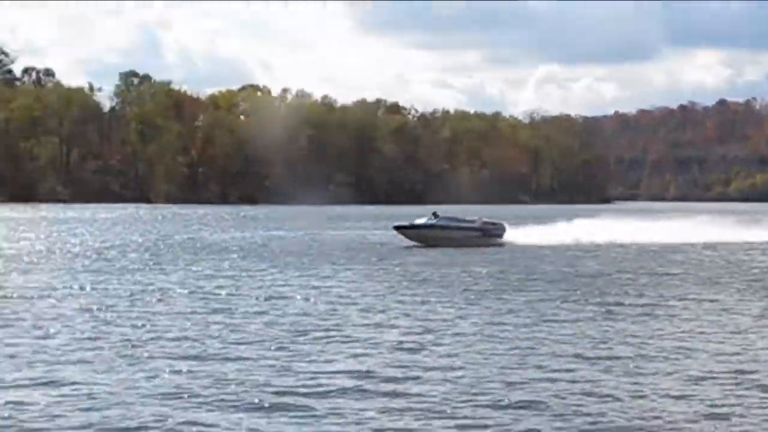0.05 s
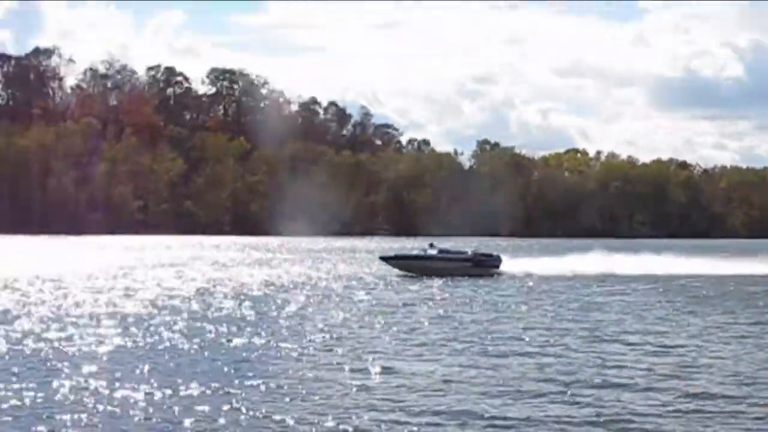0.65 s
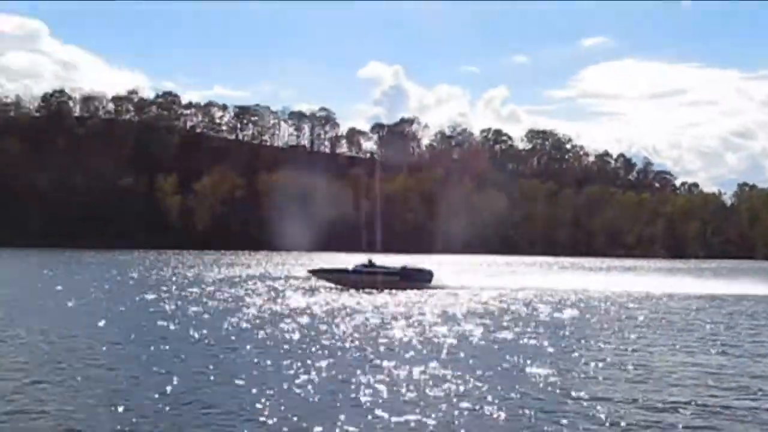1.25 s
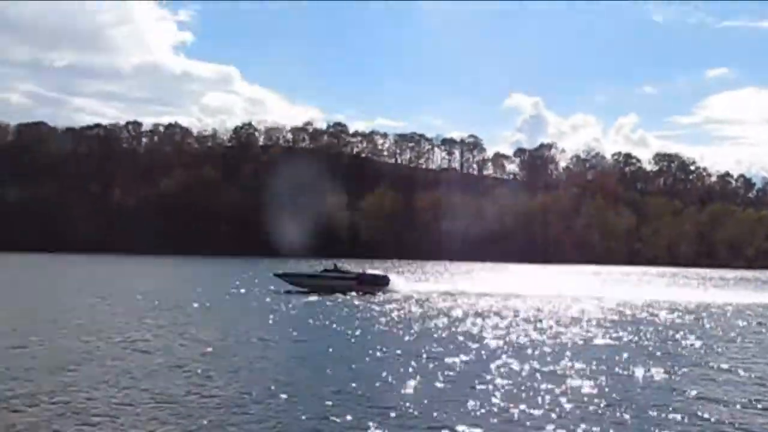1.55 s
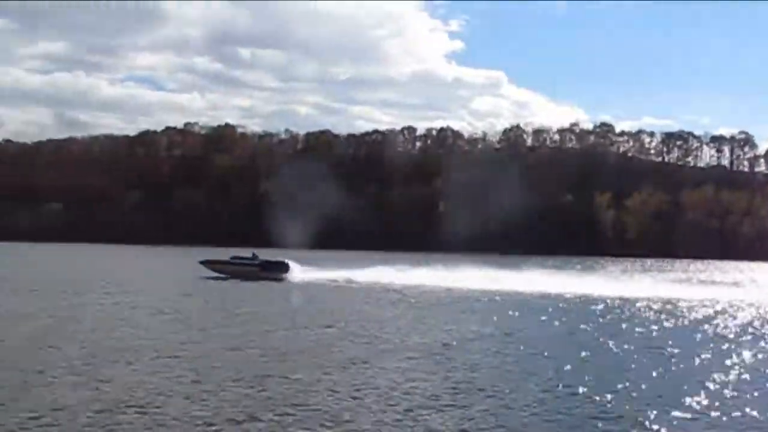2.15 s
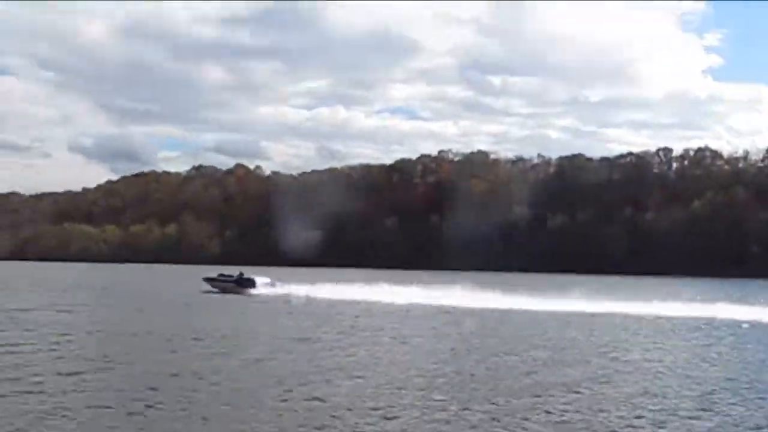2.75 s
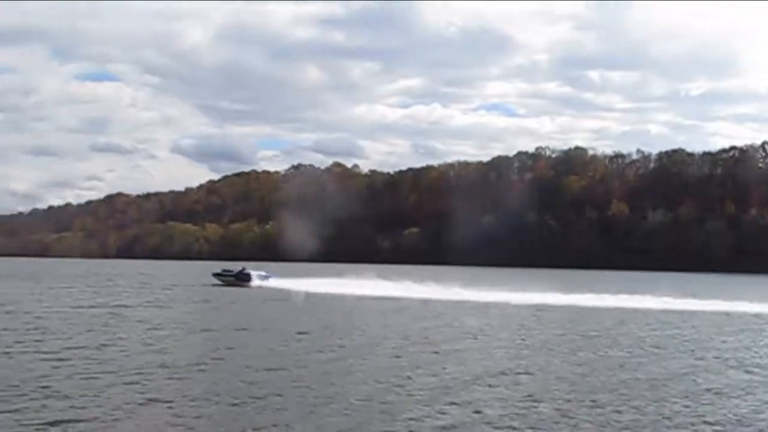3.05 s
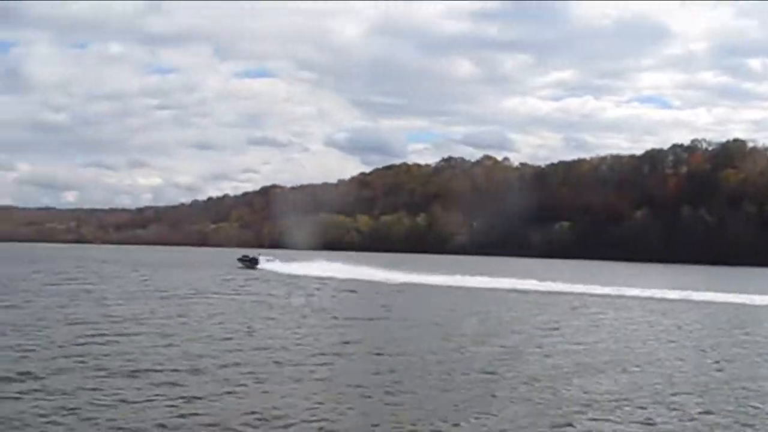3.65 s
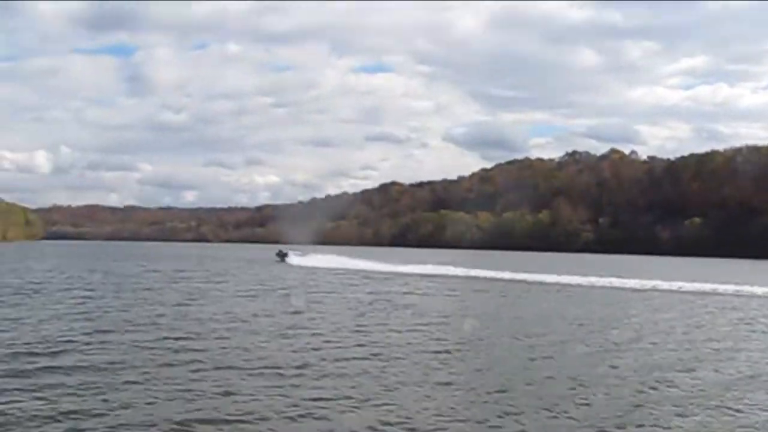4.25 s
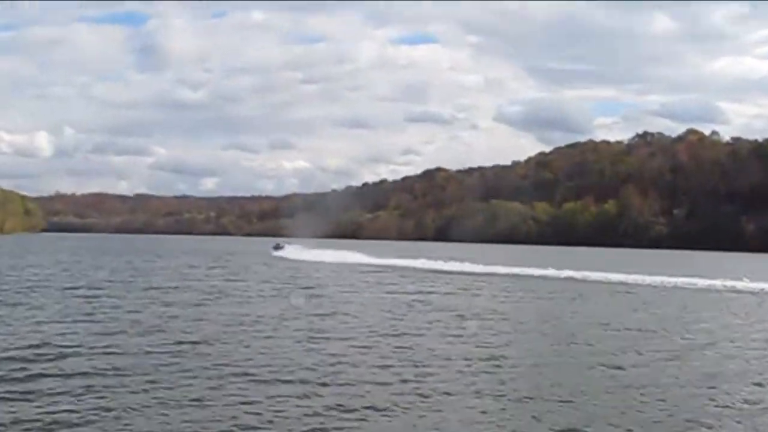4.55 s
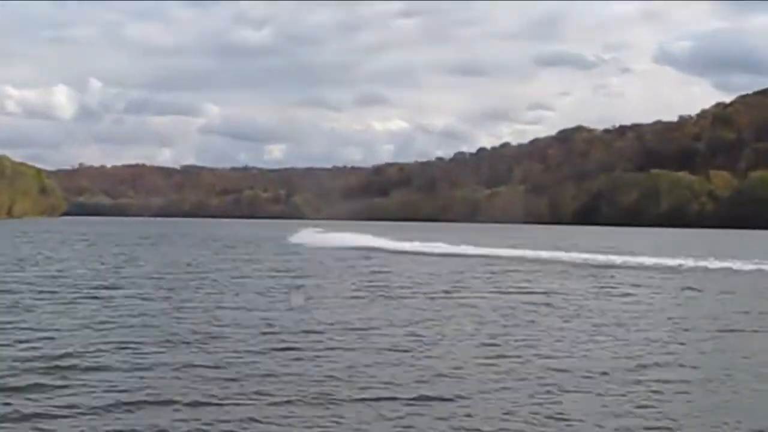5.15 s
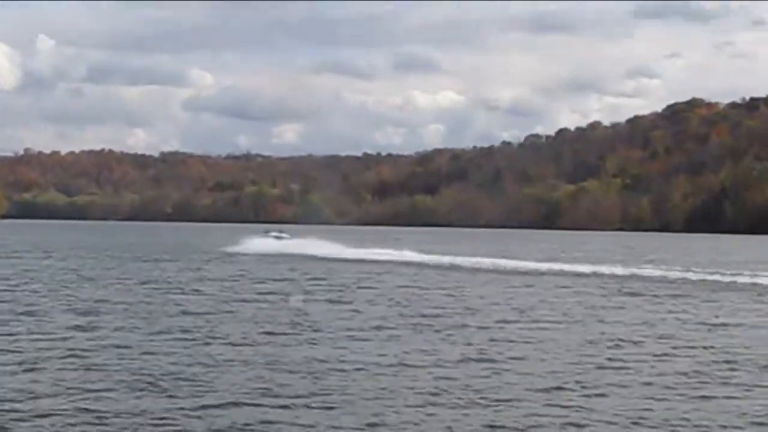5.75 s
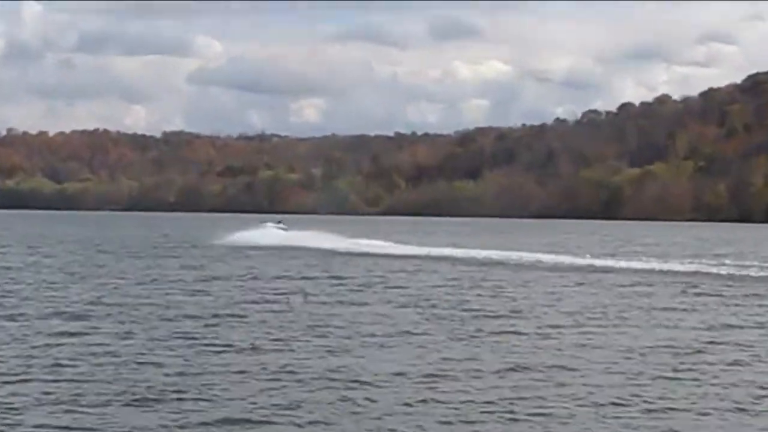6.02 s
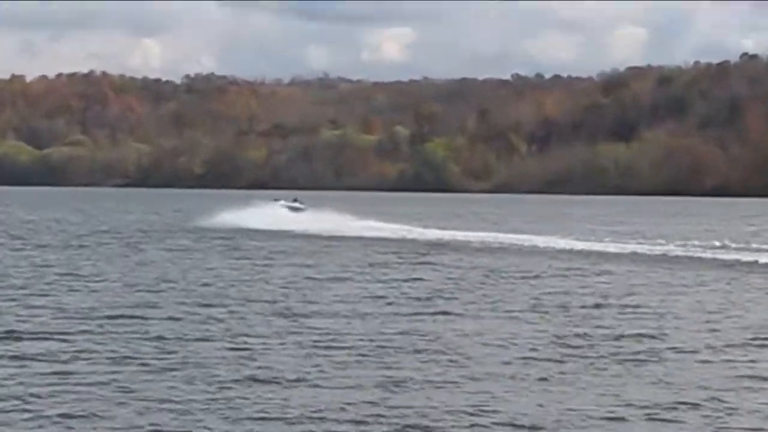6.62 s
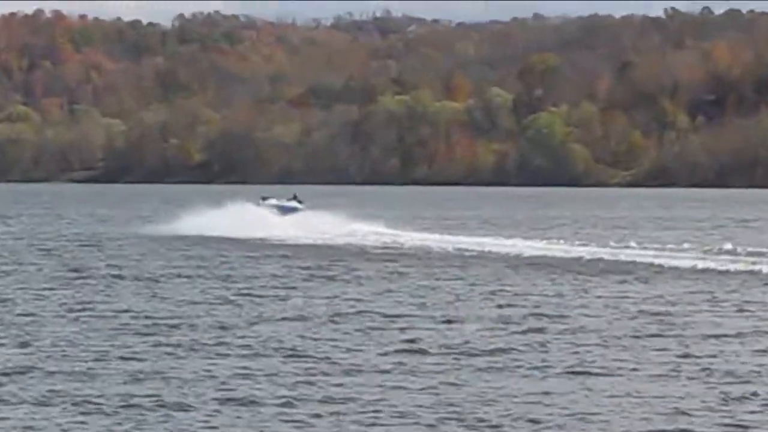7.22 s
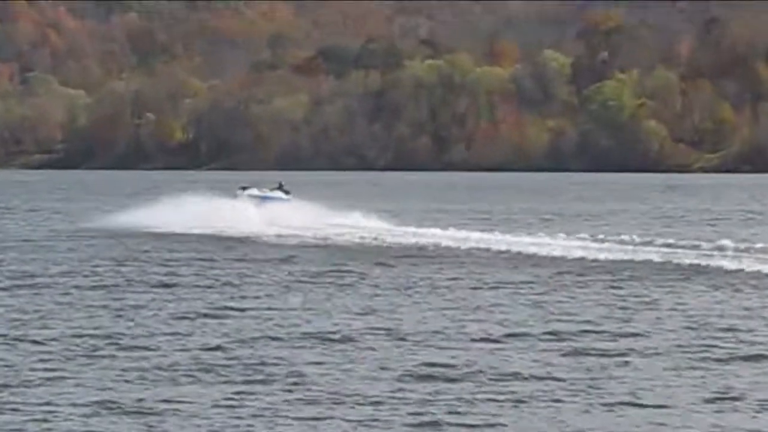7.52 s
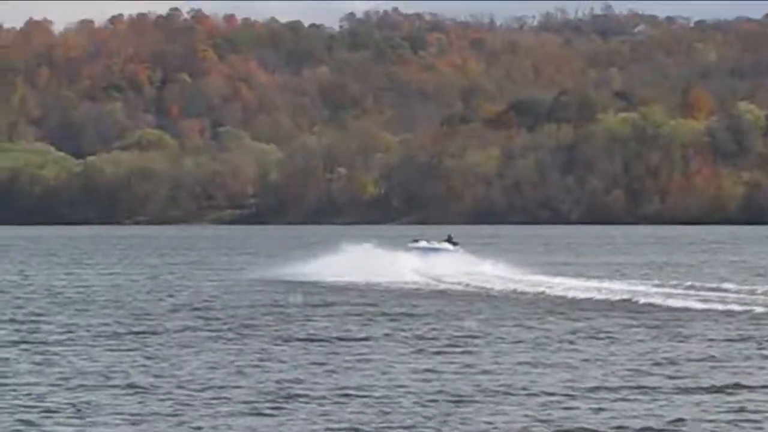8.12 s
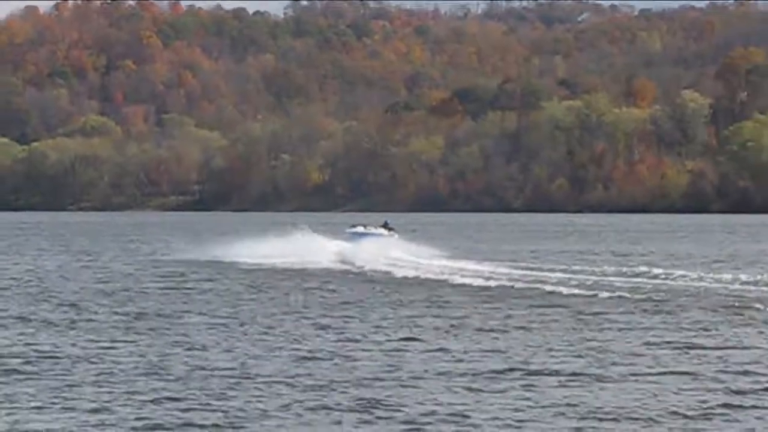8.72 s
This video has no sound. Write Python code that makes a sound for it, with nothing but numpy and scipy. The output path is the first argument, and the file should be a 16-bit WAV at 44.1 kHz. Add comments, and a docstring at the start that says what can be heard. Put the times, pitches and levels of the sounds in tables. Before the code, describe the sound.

A diesel speedboat races past on a lake, its throbbing engine drone falling in pitch while water rushes along the hull. As it draws away, a raspy exhaust, gear whine and a thin, flickering whistle come up over the hiss of spray. These fade, leaving a lower, pulsing drone. Wind rumbles on the shore microphone at the start and again later, with a couple of faint wave taps.

```python
"""A lake shore, a stereo microphone in the breeze, small waves tapping close by. A twin-diesel speedboat
passes 75 m out at full throttle and draws away, hull, wake and spray rushing. Its firing tone falls
with the Doppler shift and throbs as the two engines beat. Exhaust rasp, gear whine and a turbo whistle
come up once the stern faces the shore. Wind eddies rumble and buffet at the microphone."""
import sys
import numpy as np
from scipy import signal
from scipy.fft import rfft, irfft, next_fast_len
from scipy.io import wavfile
from scipy.ndimage import map_coordinates

SR = 44100
rng = np.random.default_rng(int(sys.argv[2]) if len(sys.argv) > 2 else 0)


def generate_wav(sig):
    """Save sig (samples, or channels by samples) to the path in sys.argv[1] as 16-bit PCM at SR."""
    pcm = np.round(np.clip(np.atleast_2d(sig).T, -1, 1) * 32767).astype(np.int16)
    wavfile.write(sys.argv[1], SR, pcm)


N = 387198
TIME = np.arange(N) / SR

# Spectra give shape only, as level per hertz. Angles count aft of abeam.
# how alike the boat sounds at the two microphones: f/Hz, likeness/0-1
BOAT_LIKENESS = [(1300, 1), (1500, .92), (2000, .85), (3200, .62), (5200, .62), (8000, .8), (10000, .9)]
# lean of the boat's noise across the pair: f/Hz, left minus right/dB
BOAT_BALANCE = [(200, 0), (1100, 0), (1900, -0.7), (2700, -3.5), (3400, -2.5), (4600, 0.5), (10000, -0.5)]
# the boat's bearing: t/s, delay at the right microphone/microseconds
RIGHT_DELAY = [(0, -23), (2.2, 2), (2.9, -19), (5.1, 23), (5.7, 86), (8.78, 86)]
# air over the open lake: f/Hz, level/dB
LAKE_SPECTRUM = [(300, 20), (1100, 4.5), (2000, -3), (3500, -20.5), (6000, -28.5), (8500, -11),
                 (11000, -50.5)]
# breeze on the microphone, with a lull as the boat goes by: t/s, rumble/dB, buffet/dB
WIND_LEVELS = [(0, -28, -27.5), (1.3, -32.5, -31), (1.85, -27.5, -30), (2.1, -40, -70), (2.75, -45, -69),
               (3.15, -35, -61), (3.7, -46, -58), (4.3, -42, -62), (4.9, -33.5, -50), (5.4, -31.5, -41),
               (5.9, -28.5, -37), (6.6, -27.5, -41), (6.95, -23, -38.5), (7.3, -27, -42.5),
               (8.78, -28.5, -47)]
# low wind rumble: f/Hz, level/dB
RUMBLE_SPECTRUM = [(10, -9.5), (25, -7), (45, 1.5), (75, -0.5), (130, -4), (200, -7), (290, -19.5),
                   (450, -29.5), (1000, -66)]
# higher wind buffeting: f/Hz, level/dB
BUFFET_SPECTRUM = [(60, -10), (125, 3.5), (220, 2), (300, -5), (400, -8.5), (550, -18), (1000, -45),
                   (3000, -61)]
# single gusts: t/s, buffet/dB
WIND_GUSTS = [(.25, -24.5), (.9, -23), (1.75, -28), (3.48, -37), (6.19, -32), (6.98, -32), (7.64, -35),
              (7.81, -27.5), (8.37, -35)]
# waves tapping the shore: t/s, level/dB, upper edge/Hz
SHORE_SLAPS = [(6.584, -27.5, 2600), (8.521, -32.5, 8000), (8.53, -42, 9000)]
# a wave's slap: f/Hz, level/dB
SLAP_SPECTRUM = [(300, -9), (800, 0), (1300, -4), (2500, -15), (5000, -24), (11000, -27)]
# churning wake: f/Hz, level/dB
WAKE_SPECTRUM = [(350, -12), (620, 3.5), (880, -1), (1080, -6), (1250, -2), (1800, -18.5), (3000, -28)]
# water rushing along the hull: f/Hz, level/dB
HULL_SPECTRUM = [(60, -21.5), (120, 5.5), (250, 7.5), (420, -4.5), (560, 2), (750, -0.5), (1000, -5),
                 (1350, -9), (2000, -27.5), (4000, -45)]
# hiss that intake, whine and spray follow: t/s, level/dB
SHARED_HISS = [(0.0, -46.5), (0.34, -52), (0.68, -42.5), (1.1, -46), (2.05, -39), (2.2, -42), (2.42, -47),
               (2.56, -43), (2.69, -36.5), (3.0, -34.5), (3.72, -39), (4.03, -47.5), (4.37, -39.5),
               (4.86, -46.5), (5.43, -46), (7.75, -53), (8.78, -51.5)]
# tail of spray: f/Hz, level/dB
SPRAY_SPECTRUM = [(2000, -23), (3800, 13.5), (4900, 14), (6200, 9), (7500, 3), (9000, -17.5), (10800, -45),
                  (14000, -30.5)]
# fine treble sizzle, dropping out midway and returning faintly: t/s, level/dB
SIZZLE_ENVELOPE = [(0, -60), (.4, -63.5), (.55, -55), (2, -48.5), (2.5, -52), (3.2, -53.5), (3.9, -76),
                   (5.2, -74), (5.9, -58), (7.3, -60.5), (8.78, -62.5)]
# colour of the sizzle: f/Hz, level/dB
SIZZLE_SPECTRUM = [(5000, -9.5), (7500, -5), (9500, -12), (11000, -17.5)]
# sheets of spray off the hull: t/s, half width/s, level/dB, centre/Hz
SPRAY_SHEETS = [(.9, .06, -40, 895), (2.1, 0.14, -38.5, 1330), (2.28, 0.031, -37, 2900),
                (2.75, 0.12, -38.5, 1060), (3.14, .04, -42.5, 4300), (4.52, 0.098, -48, 4930),
                (5.18, .03, -51, 5200), (5.39, 0.054, -52, 4280), (7.28, .15, -56.5, 4800)]
# intake hiss: f/Hz, level/dB
INTAKE_SPECTRUM = [(1200, -3), (2000, 5), (2400, 6), (2800, 5.5), (3200, 3), (3650, 0), (4200, -15.5),
                   (6000, -67)]
# gear and blower tones: multiple of the firing rate
WHINE_ORDERS = [7.19, 8.02, 10.77, 12.04, 14.32, 16.06, 20.08]
# their strengths, before beaming: relative level/dB
WHINE_LEVELS = [-13, -9, -16, -5, -19, -9, -36]
# their beams astern: half width/degrees
WHINE_BEAM_WIDTHS = [12, 8.9, 15, 13.4, 12, 10.6, 12]
# their shadowing by the hull, from dead ahead: loss/dB
WHINE_SHADOWS = [8, 5, 10, 13, 20, 39, 30]
# flares of the turbo whistle: t/s, half width/s, gain/dB
TURBO_FLARES = [(2.94, 0.028, 6), (4.13, 0.047, 3.5), (4.49, 0.16, 9), (5.183, 0.03, 16), (5.28, 0.06, 5.5)]
# exhaust burbling in the water: t/s, level/dB
BURBLE_ENVELOPE = [(0, -58), (2.6, -42.5), (3.8, -42), (4.15, -38), (4.5, -34), (5.0, -39.5), (5.18, -34),
                   (5.27, -32), (5.5, -42.5), (8.78, -51)]
# colour of the burble: f/Hz, level/dB
BURBLE_SPECTRUM = [(120, -6.5), (240, 0.5), (350, -2), (480, -10.5), (800, -30.5)]
# exhaust rasp: t/s, level/dB
RASP_ENVELOPE = [(0.0, -55), (0.12, -49.5), (0.78, -49), (0.83, -39.5), (1.12, -48), (1.71, -38.5),
                 (1.88, -40.5), (2.05, -32.5), (2.52, -40.5), (2.8, -40), (3.15, -35), (3.4, -43.5),
                 (3.62, -35.5), (4.86, -37), (4.91, -34.5), (5.11, -37), (5.18, -33.5), (5.52, -45.5),
                 (8.78, -49.5)]
# gas noise of the rasp: f/Hz, level/dB
RASP_SPECTRUM = [(700, -17), (1300, -1), (1480, 2), (1640, 4.5), (1850, 1.5), (2150, -5.5), (2700, -28),
                 (5000, -91)]
# howl of the outlets, shifting as the stern rides the water: t/s, f/Hz
OUTLET_PITCH = [(2.7, 1720), (2.98, 1780), (3.11, 1700), (3.24, 1930), (3.37, 1670), (3.52, 1660),
                (3.68, 1590), (3.74, 1689), (4.35, 1770), (4.8, 1571), (5.14, 1700), (5.4, 1650)]
# firing rate on board, sinking slowly: t/s, f/Hz
FIRING_RATE = [(0, 232.4), (4, 217.7), (4.8, 216), (6.2, 207.9), (8.78, 201.2)]
# the engines fire in opposition: t/s, first engine/dB, second relative to first/dB
OPPOSITIONS = [(-.3, -17, -42), (.24, -27, -6), (1.05, -27.5, -4), (1.65, -20.5, -11), (2.6, -24, -7.5),
               (3.45, -25.5, -13), (4.22, -26.5, -4), (5.08, -23.5, -2), (6.13, -25.5, -8.5),
               (7.0, -25.5, -4), (7.95, -29.5, 1.5), (8.9, -29, -1)]
# weak exhaust and propeller tones: multiple of the firing rate
WEAK_ORDERS = [.5, .75, 1.2, 3]
# their strengths, before beaming: level relative to the first engine/dB
WEAK_LEVELS = [-11.5, -16.5, -17.5, -32.5]
# the firing tone's octave, coming and going: t/s, level/dB
OCTAVE_ENVELOPE = [(0, -52), (2, -44), (2.8, -51), (3.02, -37), (3.3, -43.5), (3.55, -35), (3.95, -54),
                   (4.2, -44.5), (4.55, -45.5), (4.9, -56), (5.3, -42), (6, -54), (8.78, -55.5)]


def from_db(db):
    """Decibels to gain."""
    return 10 ** (np.asarray(db) / 20)


def rms_one(x):
    """Scale to unit power."""
    return x / np.sqrt(np.mean(x ** 2) + 1e-20)


def in_time(rows):
    """Each column of a timed table at every sample."""
    times, *columns = np.transpose(rows)
    return [np.interp(TIME, times, column) for column in columns]


def over_hz(points, hz):
    """Read a curve on a log-frequency axis."""
    at, values = np.transpose(points)
    return np.interp(np.log(hz), np.log(at), values)


def swell(at, centre, width):
    """A smooth hump of height 1, down to 1/e at one width either side."""
    return np.exp(-((at - centre) / width) ** 2)


def drift(rate_hz):
    """Slow random motion of spread 1."""
    hop, settle = 40, 2000
    pole = np.exp(-2 * np.pi * hop * rate_hz / SR)
    kicks = rng.standard_normal(N // hop + settle + 2)
    slow = signal.lfilter([1], [1, -2 * pole, pole * pole], kicks)[settle:]
    return np.interp(np.arange(N) / hop, np.arange(len(slow)), rms_one(slow))


def pan(x, db):
    """Place a sound by its left minus right level."""
    return x * from_db(np.array([[1], [-1]]) * db / 2)


def noise(spectrum, likeness=None, balance_db=None):
    """Coloured stereo noise, unit power in mono; by default it has the boat's stereo image."""
    size = next_fast_len(N)
    hz = np.maximum(np.arange(size // 2 + 1) * SR / size, 1)
    alike = np.clip(over_hz(BOAT_LIKENESS, hz) if likeness is None else likeness, 0, 1)
    lean_db = over_hz(BOAT_BALANCE, hz) if balance_db is None else balance_db
    roll_off = np.minimum(spectrum[-1][0] / hz, 1) ** 4
    mid, side = rfft(rng.standard_normal((2, size))) * from_db(over_hz(spectrum, hz)) * roll_off
    left_right = np.sqrt(1 + alike) * mid + np.sqrt(1 - alike) * side * [[1], [-1]]
    pair = irfft(pan(left_right, lean_db), size)[:, :N]
    return pair / np.std(pair.mean(axis=0))


def tone(turns):
    """A sine of unit power."""
    return np.sqrt(2) * np.sin(2 * np.pi * turns)


def scattered(turns, width_hz, order=2):
    """A tone smeared into a narrow band by turbulent air and moving water."""
    smooth = signal.butter(order, width_hz, fs=SR, output="sos")
    a, b = signal.sosfilt(smooth, rng.standard_normal((2, N)))
    return rms_one(a * np.sin(2 * np.pi * turns) + b * np.cos(2 * np.pi * turns))


def course():
    """The straight pass, from the shore: angle aft of abeam in radians, and Doppler factor."""
    speed_m_per_s, sound_m_per_s, nearest_m, abeam_s = 49.9, 343, 74.6, 1.785
    angle = np.arctan(speed_m_per_s * (TIME - abeam_s) / nearest_m)
    return angle, 1 / (1 + speed_m_per_s / sound_m_per_s * np.sin(angle))


def beam_db(angle, width_deg):
    """Gain at the microphone as a beam from the stern sweeps over it."""
    outside_db, rise_db, axis_deg = -7.5, 9.5, 53.2
    return outside_db + rise_db * swell(np.degrees(angle), axis_deg, width_deg)


def from_bearing(pair):
    """Sound from the left reaches the right microphone a little later."""
    delay_s = in_time(RIGHT_DELAY)[0] * 1e-6
    right = map_coordinates(pair[1], [(TIME - delay_s) * SR], order=3, mode="nearest")
    return np.array([pair[0], right])


def lake():
    """The faint, steady hush of open water."""
    return from_db(-51.5) * noise(LAKE_SPECTRUM, likeness=1.0, balance_db=-1.0)


def wind():
    """Eddies at the microphone ports: a rumble, largely separate in each, and gusty buffeting above it."""
    rumble_db, buffet_db = in_time(WIND_LEVELS)
    rumble = from_db(rumble_db + 2.25 * drift(12)) * noise(RUMBLE_SPECTRUM, likeness=.08, balance_db=-3.5)
    eddies = noise(BUFFET_SPECTRUM, likeness=.5, balance_db=-1.5) * from_db(2 * drift(30))
    gusts = sum(from_db(db) * swell(TIME, s, width=.041) for s, db in WIND_GUSTS)
    return rumble + np.hypot(from_db(buffet_db), gusts) * eddies


def shore_slaps():
    """Small waves tap the shore close by: bursts, dull or bright, that die at once."""
    attack_s, t60_s = .0015, .03
    splash, out = noise(SLAP_SPECTRUM), 0
    for s, db, edge_hz in SHORE_SLAPS:
        rise = np.clip((TIME - s) / attack_s, 0, 1)
        decay = from_db(db - 60 * np.maximum(TIME - s - attack_s, 0) / t60_s)
        lowpass = signal.butter(2, edge_hz, fs=SR, output="sos")
        out = out + rise * decay * signal.sosfilt(lowpass, splash)
    return out


def wake(angle):
    """The churning wake roars as it swings into view."""
    in_view = swell(np.degrees(angle), centre=33, width=16.3)
    return from_db(-34 + 1.3 * drift(13)) * in_view * noise(WAKE_SPECTRUM)


def hull(angle):
    """Water rushes along the hull, fading with distance."""
    abeam_db, astern_gain_db = -30.5, 1.5
    spreading_db = 20 * np.log10(np.cos(angle))
    level_db = abeam_db + astern_gain_db * np.sin(angle) + 1.29 * spreading_db
    return from_db(level_db + 1.75 * drift(7.6)) * noise(HULL_SPECTRUM)


def spray(hiss_db):
    """The boat throws a hissing tail of spray; a fine treble sizzle flickers with it."""
    gush_db = .8 * drift(22)
    tail_db = -53.5 + .8 * (hiss_db - hiss_db.mean())
    tail = from_db(tail_db + gush_db) * noise(SPRAY_SPECTRUM)
    return tail + from_db(in_time(SIZZLE_ENVELOPE)[0] + gush_db) * noise(SIZZLE_SPECTRUM)


def splashes():
    """The hull meets the chop and throws sheets of spray, each a swell of hiss around its own pitch."""
    step_octaves, out = .51, 0
    for s, width, db, hz in SPRAY_SHEETS:
        colour = [(hz * 2 ** (k * step_octaves), -10 * k ** 2) for k in range(-2, 3)]
        out = out + from_db(db) * swell(TIME, s, width) * noise(colour)
    return out


def machinery(turns, hiss_db, angle):
    """Gears and blowers whine through the intake hiss: wavering tones in rough halos, each in a beam."""
    intake = from_db(hiss_db + 1 + 1.7 * drift(14.7)) * noise(INTAKE_SPECTRUM)
    whine = 0
    for k, db, width_deg, loss_db in zip(WHINE_ORDERS, WHINE_LEVELS, WHINE_BEAM_WIDTHS, WHINE_SHADOWS):
        fading = rms_one(from_db(3 * drift(5)))
        wavering = .94 * fading * tone(k * turns + .16 * drift(11))
        halo = from_db(-7) * scattered(k * turns, width_hz=50)
        core = .5 * scattered(k * turns, width_hz=k)
        shadow_db = loss_db * np.minimum(np.sin(angle), 0)
        whine = whine + from_db(db + beam_db(angle, width_deg) + shadow_db) * (wavering + core + halo)
    return intake + pan(from_db(hiss_db + .5) * whine, db=-6)


def turbo(firing_hz, angle):
    """A thin, flickering whistle: it emerges as the stern turns to shore and fades behind the plume."""
    multiple = 50.5 + .155 * TIME
    turns = np.cumsum(firing_hz * multiple + 12 * drift(8.2)) / SR
    core = scattered(turns, width_hz=10.4)
    # a skirt of hiss, part shared and part separate at each microphone, clears as the boat draws away
    shared = scattered(turns - 40 * TIME, width_hz=175, order=4)
    separate = np.array([scattered(turns, width_hz=100, order=4) for side in range(2)])
    skirt_gain = from_db(np.interp(TIME, [2.5, 3.5, 4.3], [12, 1, -8]))
    whistle = (core + skirt_gain * (shared + separate)) / np.sqrt(1 + 2 * skirt_gain ** 2)
    plume_s, fade_s, full_deg, db_per_deg = 5.25, .9, 35, .7
    plume_db = -23 * (1 - np.exp(-np.maximum(TIME - plume_s, 0) / fade_s))
    turned_db = db_per_deg * np.minimum(np.degrees(angle) - full_deg, 0)
    flare_db = sum(db * swell(TIME, s, width) for s, width, db in TURBO_FLARES)
    return from_db(-53.3 + turned_db + flare_db + plume_db + 2.2 * drift(21)) * whistle


def burble():
    """Exhaust gas churns the water behind the stern: a low, lumpy roar."""
    return from_db(in_time(BURBLE_ENVELOPE)[0] + 1.2 * drift(44)) * noise(BURBLE_SPECTRUM)


def exhaust(turns, angle):
    """Gas noise puffs with the firings, the cylinder banks and the crank; part rings in the outlets."""
    howl_hz = in_time(OUTLET_PITCH)[0] + 40 * drift(9)  # wanders as the outlets dip and lift
    howl_turns = np.cumsum(howl_hz) / SR
    # facing the shore, the howl sharpens and a growl sounds about an octave below it
    hollow = from_db(2.5) * swell(TIME, 3.09, width=.21) * scattered(howl_turns, width_hz=55)
    growl = from_db(.5) * swell(TIME, 3.06, width=.12) * scattered(howl_turns * .455, width_hz=42)
    howl_share = from_db(-11 + 7 * np.sin(angle))
    howl = howl_share * scattered(howl_turns, width_hz=81)
    rasp = np.sqrt(np.maximum(1 - howl_share ** 2, .1)) * noise(RASP_SPECTRUM)
    puffs = rms_one(1 + .054 * tone(turns) + .045 * tone(turns / 2) + .035 * tone(turns / 4))
    level_db = in_time(RASP_ENVELOPE)[0] + .8 * drift(18)
    return from_db(level_db) * (howl + hollow + growl + rasp) * puffs


def twin_diesels(turns, angle):
    """Two firing tones beat: the second engine slips one firing behind between oppositions."""
    first_db, second_db = in_time(OPPOSITIONS)
    slip = np.interp(TIME, np.array(OPPOSITIONS)[:, 0], np.arange(len(OPPOSITIONS))) + .5
    first_turns = turns + .2003 * slip
    firing = tone(first_turns) + from_db(second_db) * tone(first_turns - slip)
    firing *= from_db(.5 * drift(17))
    # unequal cylinders and the propeller blades add weak, unsteady tones, beamed from the stern
    weak = sum(from_db(db + 2 * drift(7.4)) * tone(k * turns + .14 * drift(11))
               for k, db in zip(WEAK_ORDERS, WEAK_LEVELS))
    weak *= from_db(beam_db(angle, width_deg=28))
    octave = rms_one(tone(2 * turns + .15 * drift(10)) + scattered(2 * turns, width_hz=22))
    octave *= from_db(in_time(OCTAVE_ENVELOPE)[0])
    return pan(from_db(first_db) * (firing + weak) + octave, db=-.6)


def scene():
    """From the shore: the boat passing out on the lake, waves and wind close to the microphone."""
    angle, doppler = course()
    firing_hz = in_time(FIRING_RATE)[0] * doppler
    turns = np.cumsum(firing_hz) / SR
    hiss_db, = in_time(SHARED_HISS)
    rush = wake(angle) + hull(angle)
    engines = twin_diesels(turns, angle) + exhaust(turns, angle)
    engines += machinery(turns, hiss_db, angle) + burble()
    offshore = lake() + rush + spray(hiss_db) + splashes() + engines
    return from_bearing(offshore) + turbo(firing_hz, angle) + shore_slaps() + wind()


def record(dry):
    """The recorder cuts the top steeply."""
    cutoff_hz = 10950
    return signal.sosfilt(signal.ellip(12, .1, 90, cutoff_hz, fs=SR, output="sos"), dry)


dry = scene()
out = record(dry)
generate_wav(out)
```